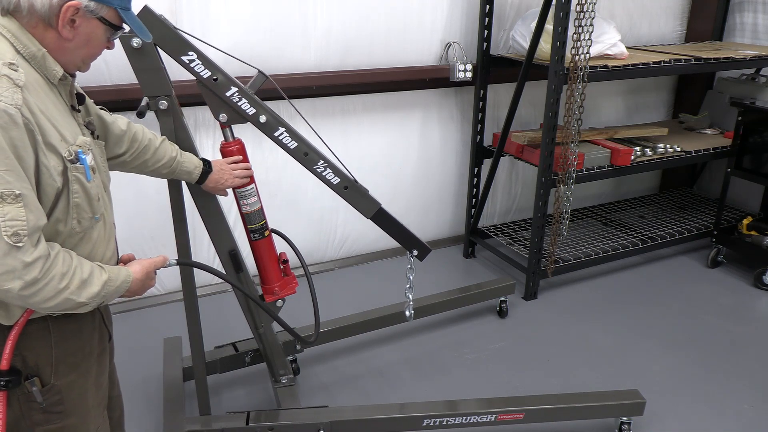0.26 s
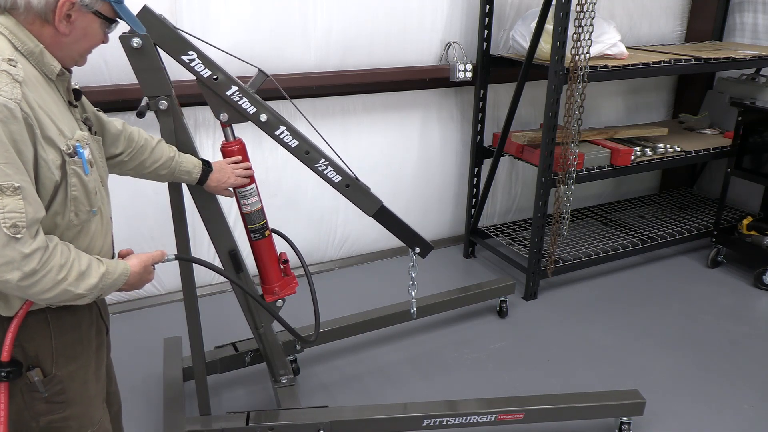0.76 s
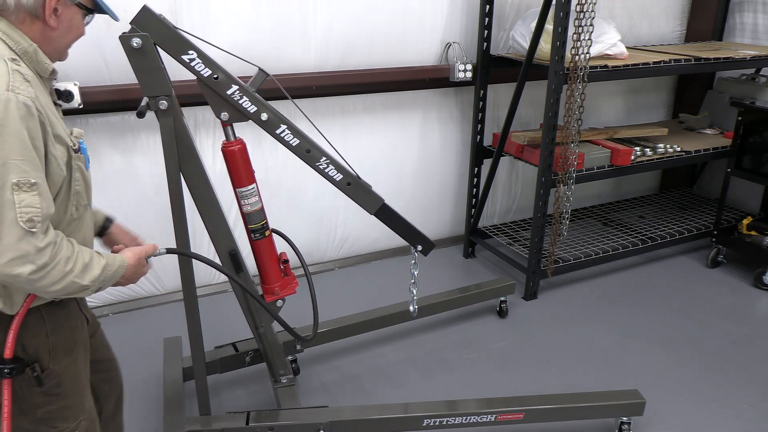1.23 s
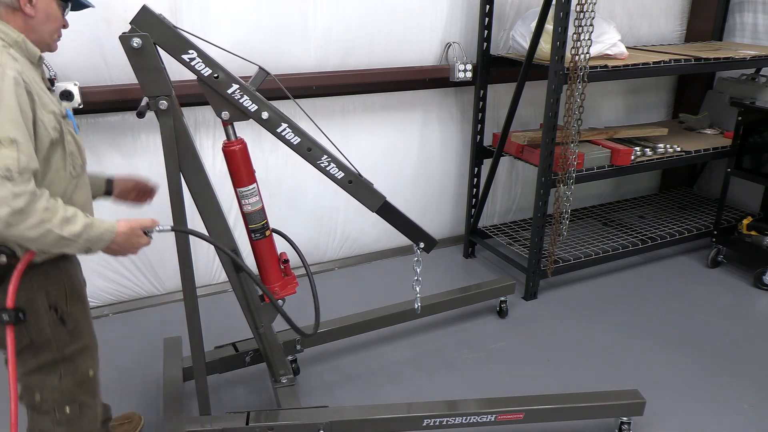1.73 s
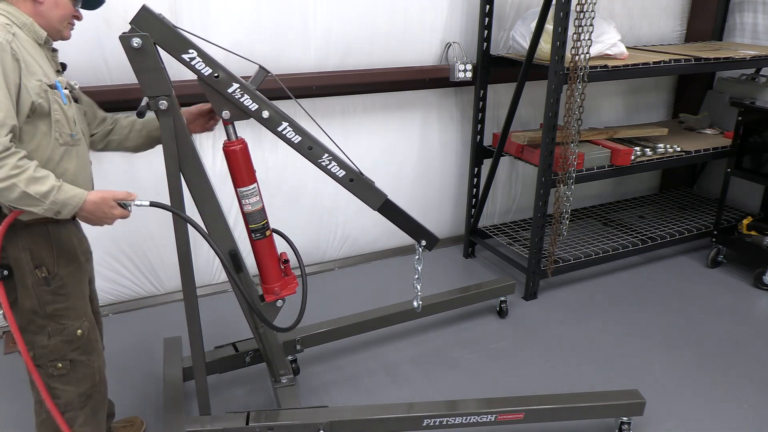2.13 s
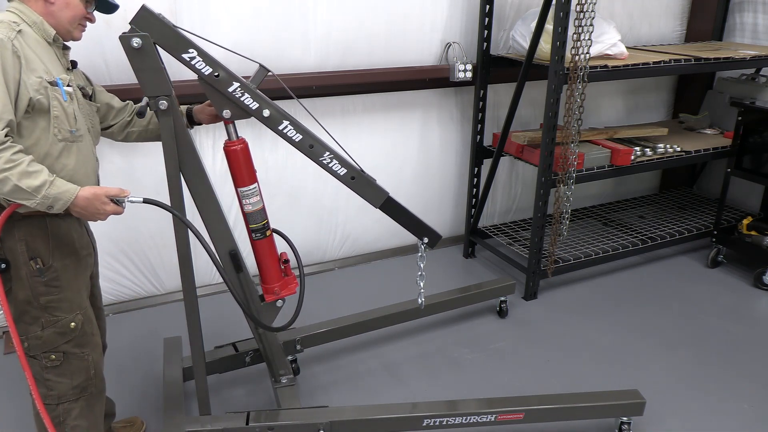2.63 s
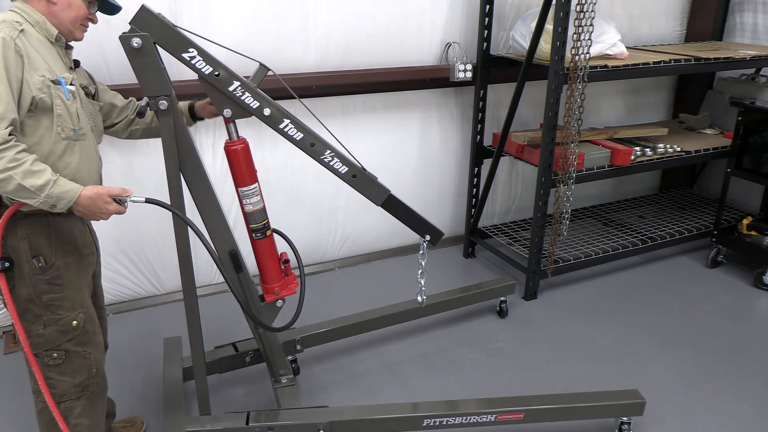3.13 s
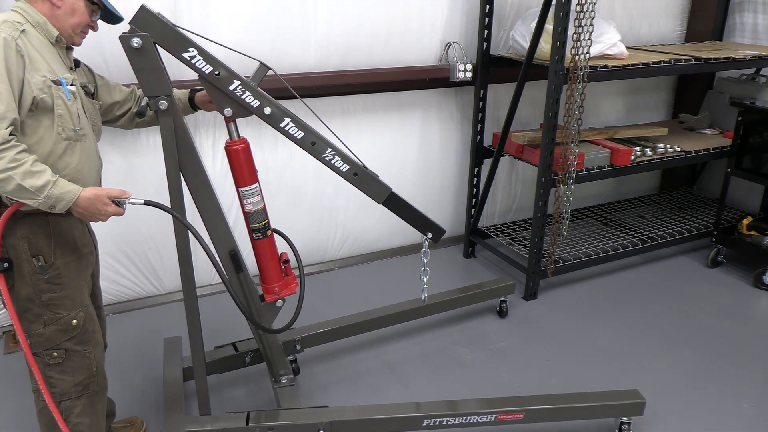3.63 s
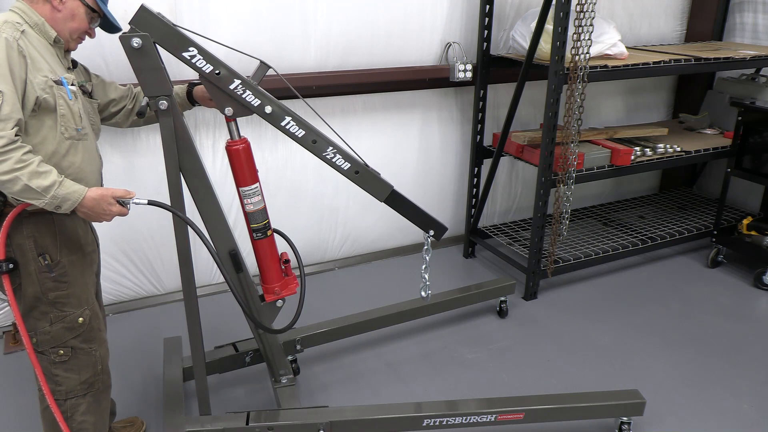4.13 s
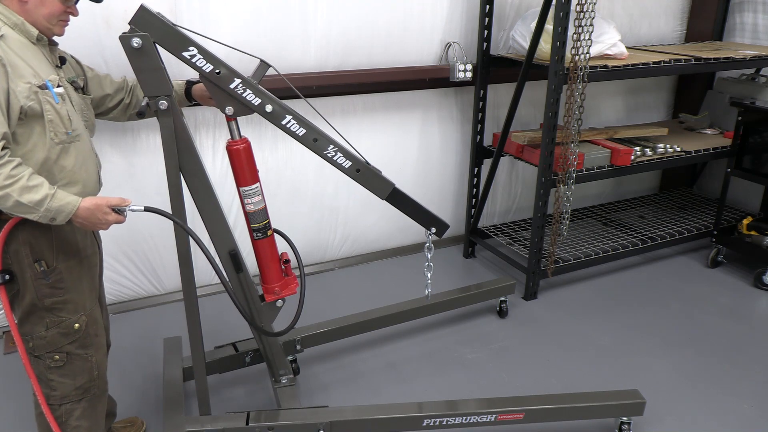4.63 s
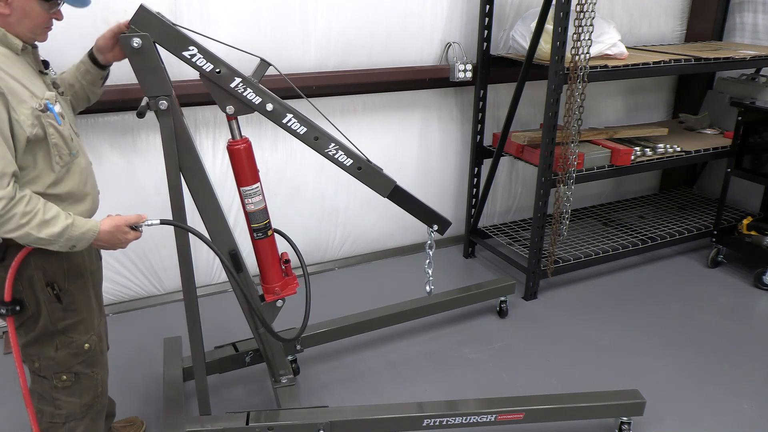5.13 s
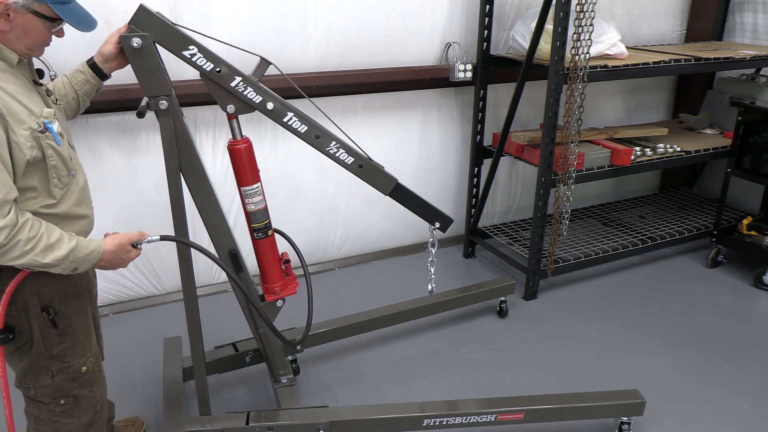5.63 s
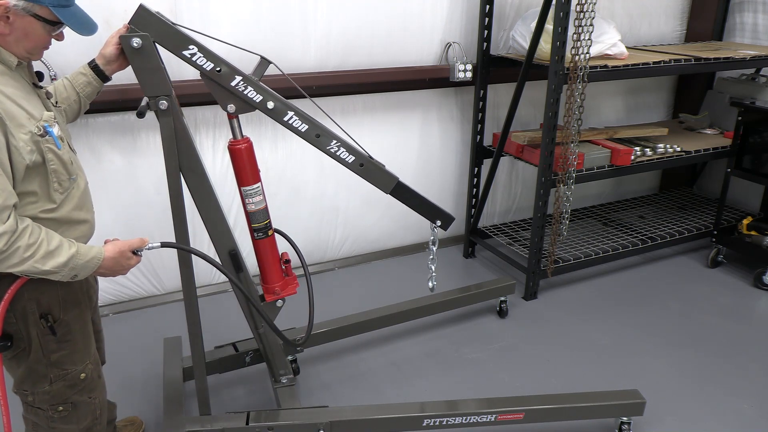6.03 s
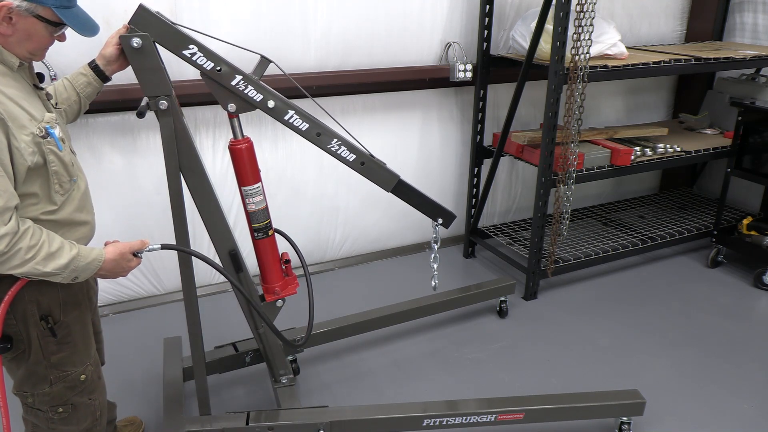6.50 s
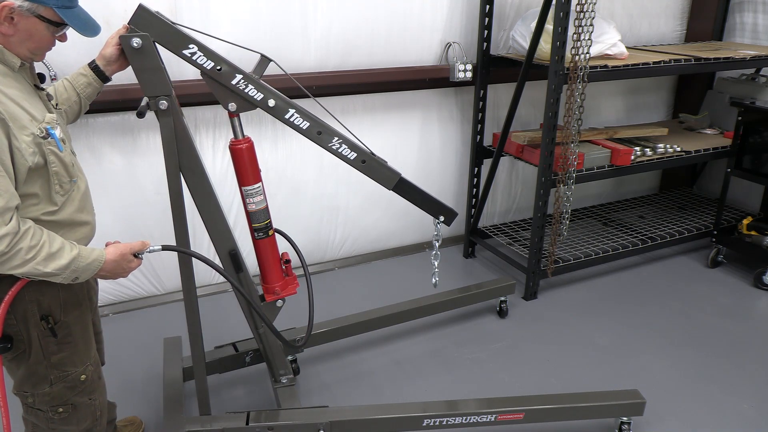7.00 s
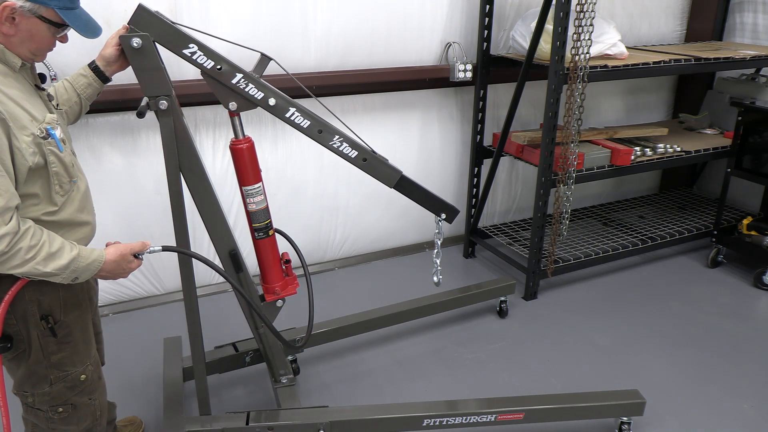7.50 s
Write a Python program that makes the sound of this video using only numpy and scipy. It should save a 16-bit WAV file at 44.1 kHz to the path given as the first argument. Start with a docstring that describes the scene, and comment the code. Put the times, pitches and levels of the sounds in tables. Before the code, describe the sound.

An air-powered hydraulic pump runs without pause in a workshop, about twenty sharp puffs of hiss a second, each with a metallic knock. Hard clacks open the first second, then ease; from about two to five seconds the hiss grows louder and brighter with heavier knocks, then drops back. Faint room noise lies underneath. Close microphone worn by the operator, mono and fairly dry.

```python
"""Air-driven crane pump at work

An air-driven hydraulic pump lifts a crane boom in a steel workshop, over steady shop noise. One microphone is
worn by the operator. Twenty times a second the air motor vents a puff of hiss (shaped noise) and its piston
knocks on the cylinder and frame (ringing tones and short noise cracks). As the operator turns and reaches up,
the hiss changes colour and a close reflection (a delayed, inverted copy) slides notches through it."""
import sys
import numpy as np
from scipy import signal
from scipy.fft import rfft, irfft
from scipy.io import wavfile
from scipy.ndimage import map_coordinates

SR = 44100
rng = np.random.default_rng(int(sys.argv[2]) if len(sys.argv) > 2 else 0)


def wav_record(signal):
    """Record a signal, one row per channel, as 16-bit PCM in the file named by sys.argv[1]."""
    frames = np.transpose(np.atleast_2d(signal))
    bounded = np.clip(frames, -1, 1)
    # unit amplitude maps onto the largest positive 16-bit level
    quanta = np.round(bounded * 32767).astype(np.int16)
    wavfile.write(sys.argv[1], SR, quanta)


N = 342216
TIME_S = np.arange(N) / SR
HZ = np.maximum(np.arange(N // 2 + 1) * SR / N, 1)   # frequency of each spectrum bin, kept above zero
FIRST_VENT_S, STROKE_S = .0005, .04935


def amp(db):
    """Turn decibels into a gain."""
    return 10 ** (np.asarray(db) / 20)


def in_time(rows):
    """Draw straight lines between the rows of a table, giving each column a value at every sample."""
    row_s, *columns = np.transpose(rows)
    return [np.interp(TIME_S, row_s, column) for column in columns]


def colour(points, bands=()):
    """Gain at each frequency, scaled so that white noise keeps its overall strength (rms 1)."""
    point_hz, point_db = np.transpose(points)
    db = np.interp(np.log(HZ), np.log(point_hz), point_db)
    for hz, width_hz, band_db in bands:
        db += band_db / (1 + (2 * (HZ - hz) / width_hz) ** 2)
    return amp(db) / np.sqrt(np.mean(amp(db) ** 2))


def flicker(rate_hz):
    """Random wander of spread 1: white noise smoothed by a two-pole lowpass."""
    pole = np.exp(-2 * np.pi * rate_hz / SR)
    slow = signal.lfilter([1], [1, -2 * pole, pole * pole], rng.standard_normal(N))
    return slow / slow.std()


def band_pass(x, order, low_hz, high_hz):
    """Keep the sound between two frequencies."""
    return signal.sosfilt(signal.butter(order, [low_hz, high_hz], "band", fs=SR, output="sos"), x)


# Where the operator stands: t/s, puff peak level/dB, stance (0 beside, 1 stepped back, 2 reaching, or between)
STANCE = [(0, -18, .03), (.85, -17, 0.15), (1.3, -16, 0.43), (1.7, -14.5, 0.79), (1.9, -12.7, 1.52),
          (2.1, -10.5, 1.66), (2.4, -11, 1.9), (3.4, -11.5, 1.73), (3.7, -12, 1.96), (4.1, -11.5, 1.98),
          (4.5, -11.5, 1.79), (5.1, -13.4, 1.57), (5.25, -16, 0.96), (5.5, -15, 1.25), (5.75, -15.5, 1.09),
          (7.76, -15.5, 1.17)]


def operator_stance():
    """Puff peak level, and how much each of the three stances counts as one blends into the next."""
    puff_peak_db, stance = in_time(STANCE)
    distance = abs(np.clip(stance, 0, 2) - np.arange(3)[:, None])
    return puff_peak_db, np.clip(1 - distance, 0, 1)


# How much earlier the puffs reach the microphone: t/s, lead [ms]
LEAD = [(0, .1), (.7, 1.4), (2.8, 2.2), (3.6, 0.38), (5.2, .1), (7.76, .8)]
# Shape of one exhaust puff: share of the stroke [0-1], level/dB before each register's depth
PUFF = [(0, -24), (.04, -2.5), (.2, -1.5), (.45, -2), (.7, -7), (.9, -15), (1, -15)]


def puffs():
    """Level in dB of the repeating puff, and the small random level change of each one."""
    lead_s = in_time(LEAD)[0] / 1e3
    strokes = (TIME_S + lead_s - FIRST_VENT_S) / STROKE_S
    uneven_db = 0.48 * rng.standard_normal(200)[np.floor(strokes).astype(int) + 1]
    return np.interp(strokes % 1, *np.transpose(PUFF)), uneven_db


# Hiss colour in each stance: f/Hz, relative level/dB per Hz
BESIDE = [(760, -33), (1300, -14), (1540, -18.5), (1650, -10), (2450, -10), (3280, -8), (6530, -4.5),
          (7100, -1.5), (7790, -2), (9110, -2.5), (9900, -2.5), (12700, -4), (15700, -18)]
STEPPED_BACK = [(760, -79), (1300, -16.5), (1620, -2), (2210, -6.5), (2430, -12), (3840, -1.5), (4170, -1),
                (5530, -1.5), (6010, 3.5), (8380, 6), (10000, 2), (11900, -3.5), (15700, -10.5)]
REACHING = [(760, -26), (1300, -16), (2700, -15.5), (3700, -6), (4500, -6), (5700, -2.5), (6400, 2.5),
            (7300, 4), (8300, 2.5), (9300, 4.5), (10500, -2), (12800, -5), (14500, -14), (15700, -22)]
# Narrow peaks and dips in each colour: f/Hz, width [Hz], level/dB at the centre
BESIDE_BANDS = [(5020, 180, 3), (10000, 350, 5.5), (11800, 800, -3.5)]
STEPPED_BACK_BANDS = [(2520, 330, 6), (6120, 110, 6), (7460, 120, 5.5), (8600, 130, 0), (11920, 930, 7),
                      (13100, 600, -5), (10100, 370, -2.5)]
REACHING_BANDS = [(2910, 180, -10.5), (3510, 270, -2), (4160, 300, -7), (5950, 150, -8.5), (7400, 110, 1.5)]


def hiss_colours():
    """The hiss spectrum heard beside, stepped back and reaching."""
    return (colour(BESIDE, BESIDE_BANDS), colour(STEPPED_BACK, STEPPED_BACK_BANDS),
            colour(REACHING, REACHING_BANDS))


# Hiss registers: top f/Hz, depth [multiplies the puff's dB], echo fill level/dB added to ECHO
REGISTERS = [(4500, 0.69, -7.5), (9600, 1.04, -3), (20000, 2.23, -9)]
# Echoes between puffs, one value per stance (beside, stepped back, reaching): level/dB before the register's fill
ECHO = (-1.5, -4.5, -13.5)


def exhaust(puff_peak_db, shares):
    """Turbulent air is noise gated by each stroke; echoes fill the gaps between puffs."""
    puff_db, uneven_db = puffs()
    echo_db = np.dot(ECHO, shares)
    grit = amp(0.23 * flicker(870))   # fast random roughness
    gated, below = 0, 0
    for top_hz, depth, fill_db in REGISTERS:
        gate = np.hypot(amp(depth * puff_db + uneven_db), amp(echo_db + fill_db))
        under_top = 1 / (1 + (HZ / top_hz) ** 8)
        register_gain = np.sqrt(np.maximum(under_top - below, 0))
        gated += register_gain * rfft(rng.standard_normal(N) * grit * gate)
        below = under_top
    stance_gains = amp(puff_peak_db) * shares
    return sum(gain * irfft(gated * tint, N) for gain, tint in zip(stance_gains, hiss_colours()))


# Colour of the shop noise: f/Hz, relative level/dB per Hz
SHOP_COLOUR = [(12, -30), (20, -1), (60, -9.5), (150, -11.5), (320, -9), (430, -11.5), (600, -12.5),
               (800, -1.5), (1200, -9), (1500, -2.5), (2000, -24), (3300, -120)]
SHOP_DB = -44   # overall level/dB


def shop_noise():
    """Steady random noise, from deep rumble up to a murmur around 800 to 1500 Hz."""
    return amp(SHOP_DB) * irfft(rfft(rng.standard_normal(N)) * colour(SHOP_COLOUR), N)


# Ordinary knock, mostly earlier as the load grows: t/s, share of the stroke [0-1], thud level/dB, crack level/dB
# (both levels are blow strengths, before ringing and filters)
ORDINARY = [(0, 0.71, -48, -39), (.78, 0.59, -38.5, -24), (.87, 0.65, -27, -17.5), (1.2, 0.56, -26.5, -17),
            (1.6, 0.61, -21.5, -15), (2.2, 0.55, -18, -20.5), (2.4, 0.59, -23, -28),
            (4.3, 0.55, -21.5, -28.5), (4.7, 0.48, -18, -19), (5.2, 0.49, -22, -22),
            (5.501, 0.45, -21.5, -19), (5.75, 0.39, -24.5, -18.5), (7.76, 0.43, -26.5, -19)]
# Hard knocks, each in place of an ordinary one: t/s, thud level/dB, crack level/dB (blow strengths)
HARD = [(.04, -26, -13), (.14, -27, -12), (.239, -18.5, -10.5), (.335, -25, -14), (.434, -23, -12),
        (.532, -24, -14), (.63, -25, -11), (.727, -23.5, -14), (.823, -32, -15), (1.659, -20, -15),
        (1.709, -18, -14), (1.755, -19.5, -22), (1.807, -20, -16), (1.857, -13.5, -14.5),
        (1.957, -14.5, -15), (2.053, -13, -17.5), (2.153, -12, -17), (2.2, -14.5, -20), (2.396, -16, -20),
        (2.446, -13, -21.5), (2.644, -13, -20), (2.693, -12.5, -19.5), (2.743, -13.5, -18),
        (2.837, -15, -24), (2.889, -16.5, -20), (2.944, -15, -19), (3.039, -12.5, -19.5), (3.087, -12, -19),
        (3.135, -16, -22), (3.184, -15.5, -19), (3.286, -15.5, -21), (3.58, -16, -21),
        (3.633, -14.5, -17.5), (3.68, -16, -19.5), (3.73, -14.5, -18), (3.777, -13, -17),
        (3.875, -12, -18.5), (3.925, -11, -19), (3.978, -10.5, -16.5), (4.074, -10, -20.5),
        (4.122, -12.5, -20), (4.22, -15, -23), (4.322, -12.5, -20.5), (4.369, -17.5, -22),
        (4.418, -16, -19.5), (4.468, -13.5, -18.5), (4.569, -14, -19), (4.619, -12, -18),
        (4.813, -17, -15.5), (4.864, -12, -18), (4.96, -15.5, -18.5)]
KNOCK_JITTER_S, THUD_SCATTER_DB, CRACK_SCATTER_DB = .001, 1.5, 0.64
CRACK_FOLLOWS = 0.26   # share of the thud's scatter that the crack takes up


def blows():
    """One piston blow a stroke (time in s, thud dB, crack dB); hard ones replace the nearest ordinary one."""
    vents_s = np.arange(FIRST_VENT_S, N / SR - STROKE_S, STROKE_S)
    row_s, *columns = np.transpose(ORDINARY)
    share, thud_db, crack_db = [np.interp(vents_s, row_s, column) for column in columns]
    expected_s = vents_s + share * STROKE_S
    late, heavy, sharp = rng.standard_normal((len(vents_s), 3)).T
    thud_scatter_db = THUD_SCATTER_DB * heavy
    crack_scatter_db = CRACK_FOLLOWS * thud_scatter_db + CRACK_SCATTER_DB * sharp
    rows = np.transpose([expected_s + KNOCK_JITTER_S * late, thud_db + thud_scatter_db,
                         crack_db + crack_scatter_db])
    nearest = [np.argmin(abs(expected_s - hard_s)) for hard_s, *_ in HARD]
    rows[nearest] = HARD
    return rows.T


def strike(blow_s, level_db, modes, shares, spread_db, flip=1):
    """A blow sets off fading tones (modes), each with a random strength; flip -1 reverses every other one."""
    at, out = (blow_s * SR).astype(int), np.zeros(N)
    chance = rng.standard_normal((len(at), len(modes)))
    for k, (hz, t60_s, *stance_db) in enumerate(modes):
        clicks = np.full(N, 1e-18)   # a tiny floor keeps the filter's numbers healthy
        mode_db = level_db + np.dot(stance_db, shares[:, at]) + spread_db * chance[:, k]
        clicks[at] = flip ** k * amp(mode_db)
        decay, turn = amp(-60 / (t60_s * SR)), 2 * np.pi * hz / SR
        out += signal.lfilter([0, np.sin(turn)], [1, -2 * decay * np.cos(turn), decay * decay], clicks)
    return out


# Cylinder tones: f/Hz, t/s to fade 60 dB, then relative level/dB beside, stepped back, reaching
THUD = [(894, 0.023, -6, -11.5, -10.5), (1060, 0.02, -11, -26, -16.5), (1000, 0.075, -15, -18, -24),
        (1060, 0.078, -24, -24, -21), (1127, 0.035, -34, -40, -36)]
THUD_FULL_DB, THUD_SLOPE = -14.5, 1.21   # full blow; dB of thud gained per dB of blow


def cylinder_thud(blow_s, thud_db, shares):
    """The piston thuds on the cylinder; oil softens the blow, so a gentle filter rounds it."""
    clack_db = THUD_FULL_DB + THUD_SLOPE * (thud_db - THUD_FULL_DB)
    return band_pass(strike(blow_s, clack_db, THUD, shares, spread_db=2.5), 1, 700, 1450)


# Frame tones: f/Hz, t/s to fade 60 dB, then relative level/dB beside, stepped back, reaching
FRAME = [(552.9, 0.15, -18.5, -25.5, -26), (587.4, 0.082, -27, -27.5, -29), (796, 0.11, -19, -22.5, -27),
         (593, 0.15, -38, -28.5, -39.5), (832, 0.09, -42, -23.5, -29), (317, 0.11, -43, -36.5, -35),
         (678, 0.3, -36, -40, -40)]


def frame_ring(blow_s, thud_db, shares):
    """The steel frame rings on; alternate tones start in opposite directions."""
    return strike(blow_s, .6 * thud_db, FRAME, shares, spread_db=2.0, flip=-1)


# Loose pin tones: f/Hz, t/s to fade 60 dB, then relative level/dB beside, stepped back, reaching
PIN = [(1957, 0.043, -14.5, -16, -19), (2410, 0.027, -16.5, -12.5, -30), (2484, 0.039, -15.5, -5.5, -16),
       (3635, .045, -11, -16, -12), (3796, 0.022, -6, -19, -25), (4820, 0.077, -7.5, -12, -28)]


def loose_pin(blow_s, crack_db, shares):
    """A loose pin rings as bright, short tones."""
    return band_pass(strike(blow_s, crack_db, PIN, shares, spread_db=2.5), 2, 1500, 5000)


SNAP_FULL_DB, SNAP_SLOPE = -12, 2.3   # full blow; dB of snap gained per dB, so weak blows hardly snap
SNAP_T60_S, RATTLE_T60_S, RATTLE_DB = 0.0082, 0.1, -5   # fade times; rattle start against the blow


def crack(blow_s, crack_db):
    """A snap of noise, then the loose parts rattle out as a longer fading noise."""
    clicks = np.full((2, N), 1e-18)
    at = (blow_s * SR).astype(int)
    clicks[0, at] = amp(SNAP_FULL_DB + SNAP_SLOPE * (crack_db - SNAP_FULL_DB))
    clicks[1, at] = amp(crack_db + RATTLE_DB)
    snap = signal.lfilter([1], [1, -amp(-60 / (SNAP_T60_S * SR))], clicks[0])
    rattle = signal.lfilter([1], [1, -amp(-60 / (RATTLE_T60_S * SR))], clicks[1])
    rattle = signal.lfilter([.01], [1, -.99], rattle)   # builds over about two milliseconds
    noise = rng.choice([-1, 1], N)
    return band_pass(2.33 * (snap + rattle) * noise, 2, 1970, 5150)


def knocks(shares):
    """Each blow sounds cylinder, frame, pin and crack; the body is too small to radiate bass."""
    blow_s, thud_db, crack_db = blows()
    body = cylinder_thud(blow_s, thud_db, shares) + frame_ring(blow_s, thud_db, shares)
    body = signal.sosfilt(signal.butter(4, 280, "high", fs=SR, output="sos"), body)
    return body + loose_pin(blow_s, crack_db, shares) + crack(blow_s, crack_db)


# Reflection off the operator's arm and chest: t/s, notch spacing f/Hz, strength [0-1]
BOUNCE = [(0, 2850, 0), (1.5, 2700, .04), (1.95, 2450, 0.37), (2.3, 2640, 0.7), (2.7, 2770, 0.6),
          (3.35, 2840, .55), (3.5, 3020, 0.6), (3.75, 3400, 0.3), (4.05, 3870, 0), (4.3, 3480, 0.2),
          (4.42, 3020, 0.7), (4.6, 2680, 0.4), (5.15, 2630, 0.2), (5.3, 2150, 0.1), (5.7, 2260, 0.4),
          (5.9, 2380, .01), (7.76, 2570, 0.18)]
# the arm is too small for lower pitches, clothing soaks up higher ones
BOUNCE_LOW_HZ, BOUNCE_HIGH_HZ = 6100, 11700


def bounce(x):
    """An inverted reflection a fraction of a millisecond late cuts evenly spaced notches."""
    spacing_hz, strength = in_time(BOUNCE)
    low_loss = 1 + (BOUNCE_LOW_HZ / HZ) ** 4
    high_loss = 1 + (HZ / BOUNCE_HIGH_HZ) ** 4
    dull = irfft(rfft(x) / low_loss / high_loss, N)
    late = map_coordinates(dull, [np.arange(N) - SR / spacing_hz], order=5, mode="nearest")
    strength = np.clip(strength, 0, 1)
    return (x - strength * late) / np.sqrt(1 + strength ** 2 / 2)   # offsets the added loudness


def scene():
    """Pump and the steady noise of the shop; one microphone feeds both channels."""
    puff_peak_db, shares = operator_stance()
    hiss = bounce(exhaust(puff_peak_db, shares))
    mono = hiss + shop_noise() + knocks(shares)
    return np.array([mono, mono])


def record(dry):
    """A steep lowpass cuts the top of the treble, 75 dB down from 15950 Hz."""
    return signal.sosfilt(signal.cheby2(20, 75, 15950, fs=SR, output="sos"), dry)


dry = scene()
out = record(dry)
wav_record(out)
```